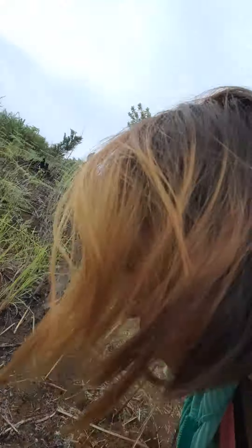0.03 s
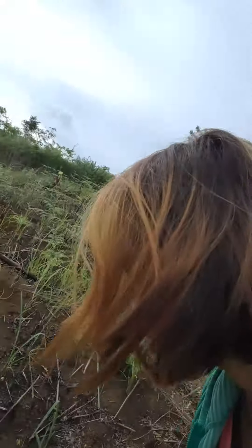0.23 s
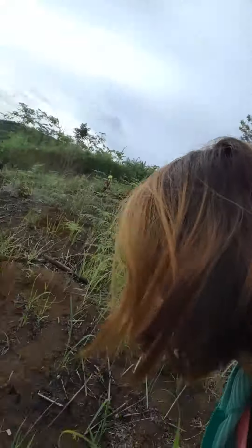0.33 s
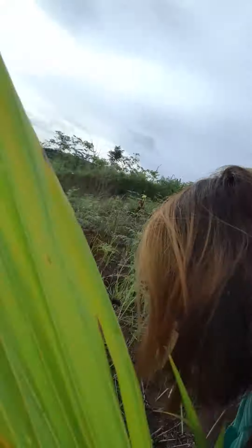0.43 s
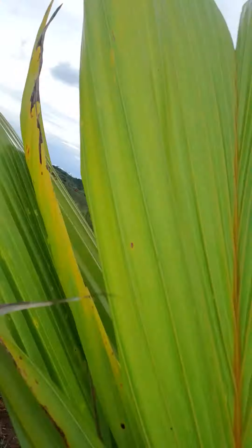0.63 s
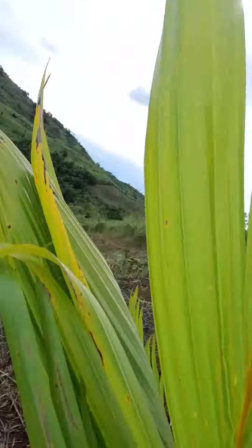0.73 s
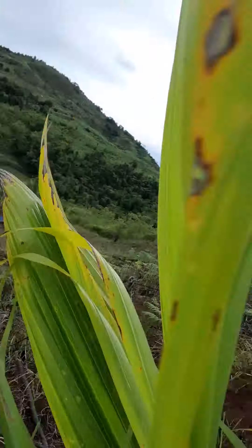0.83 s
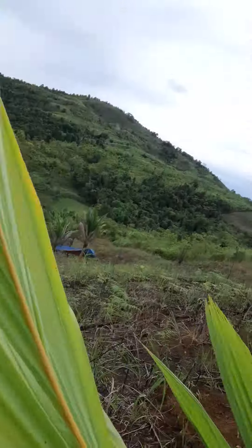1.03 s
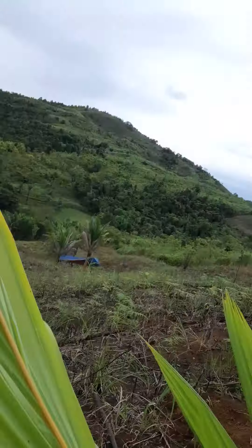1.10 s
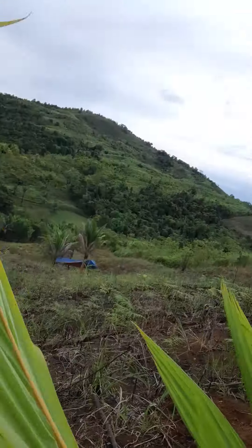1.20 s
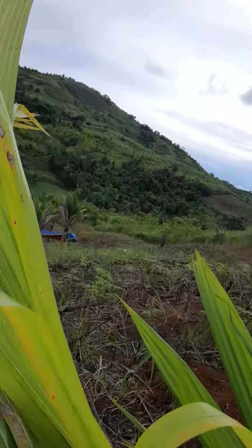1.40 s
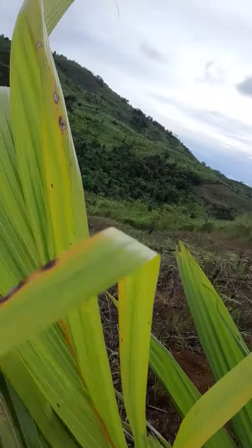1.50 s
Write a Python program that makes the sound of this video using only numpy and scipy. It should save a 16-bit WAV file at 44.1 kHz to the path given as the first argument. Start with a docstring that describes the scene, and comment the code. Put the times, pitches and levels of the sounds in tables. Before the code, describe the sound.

Large stiff leaves rustle and snap against a hand-held phone in an open field. Wind rumbles on the microphone, a leaf knocks against it, then wind and rustling die down while scattered snaps continue.

```python
"""A hand-held phone brushes through large stiff leaves in a breezy open field.
From the start the field hisses softly, gusts rumble on the two microphone openings (ports),
and leaf blades rub and bend. Soon the blades begin to buckle with sharp snaps. Half a second in,
at the height of the gusts, one knocks on the right port and shakes the phone.
Then the wind and rustling die down, while scattered snaps go on almost to the end."""
import sys
import numpy as np
from scipy import signal
from scipy.fft import rfft, irfft, next_fast_len
from scipy.io import wavfile
from scipy.ndimage import uniform_filter1d

SR = 44100
rng = np.random.default_rng(int(sys.argv[2]) if len(sys.argv) > 2 else 0)


def int16_out(signal):
    """Quantize to a 16-bit WAV file."""
    q = np.round(np.clip(np.atleast_2d(signal).T, -1, 1) * 32767)
    wavfile.write(sys.argv[1], SR, q.astype(np.int16))


N = 68355
PORT_LAG_S = 0.000411  # leaf sounds reach the left port this much later


def undb(db):
    """Turn decibels into a number to multiply by."""
    return 10 ** (np.asarray(db) / 20)


def unit(x):
    """Scale a sound so that its average strength (rms) is 1."""
    return x / np.sqrt(np.mean(x ** 2))


def curve(rows):
    """A volume that glides through points of (seconds, dB)."""
    return undb(np.interp(np.arange(N) / SR, *np.array(rows).T))


def colour(x, points):
    """Shape the tone with a filter that passes through points of (Hz, dB)."""
    size = next_fast_len(2 * N, real=True)
    hz, db = np.array(points).T
    gain = undb(np.interp(np.log(np.fft.rfftfreq(size, 1 / SR) + 1), np.log(hz), db))
    # These steps make the filter ring only after a sound, never before it.
    cepstrum = irfft(np.log(gain), size)
    cepstrum[1:size // 2] *= 2
    cepstrum[size // 2 + 1:] = 0
    return irfft(rfft(x, size) * np.exp(rfft(cepstrum)), size)[..., :N]


def wander(per_s):
    """Random values joined by straight lines, per_s of them a second."""
    return np.interp(np.arange(N) / SR * per_s, np.arange(N), rng.standard_normal(N))


def ports(pair, likeness=0.29):
    """Make two unrelated sounds partly alike: the left gets a late copy of the right."""
    left, right = pair
    late = np.interp(np.arange(N) - PORT_LAG_S * SR, np.arange(N), right)
    return np.array([likeness * late + np.sqrt(1 - likeness ** 2) * left, right])


def field():
    """The breeze in distant plants makes a soft, slightly wavering hiss."""
    # Tone of the hiss. Each row: frequency in Hz, gain in dB.
    hiss_tone = [(30,-15),(100,-5),(200,0),(260,-4.5),(335,7),(500,-5),(1000,-8.5),(2000,-6),(4000,-17),(7000,-14.5),(8200,-24),(16000,-19.5)]
    left_db, right_db = -50.5, -47
    hiss = unit(colour(rng.standard_normal((2, N)), hiss_tone))
    return hiss * undb(wander(per_s=7.85)) * undb([[left_db], [right_db]])


def wind():
    """Swirls of air rumble on each port separately, as strongly as the gust there."""
    # Wind pressure at the left and right ports. Each row: time in seconds, level in dB.
    gust_left = [(0,-79),(.05,-69),(.085,-46.5),(.135,-36),(.158,-35.5),(.27,-33),(.31,-48),(.52,-40),(.58,-36),(.68,-47.5),(.95,-61),(1.28,-55),(1.38,-78),(1.55,-76)]
    gust_right = [(0,-41),(.11,-46.5),(.14,-33.5),(.215,-30),(.25,-39),(.34,-27.5),(.39,-33.5),(.47,-30.5),(.505,-18),(.55,-24),(.635,-30.5),(.665,-39),(.755,-42.5),(.79,-54),(.86,-40.5),(.91,-57.5),(1.29,-52.5),(1.37,-59),(1.55,-67)]
    # Tone of the rumble. Each row: frequency in Hz, gain in dB.
    rumble_tone = [(20,-29),(35,-24),(52,-1),(105,-1),(150,-4.5),(210,-32.5),(320,-25),(500,-38),(2000,-60)]
    swirls = colour(rng.standard_normal((2, N)), rumble_tone)
    steady = swirls / np.sqrt(uniform_filter1d(swirls ** 2, size=2200))  # even out over 50 ms
    return steady * np.array([curve(gust_left), curve(gust_right)])


def friction(tone, slips_per_s, spread_db, hiss, spurt_db, fade_s=0.00036):
    """Leaf ribs catch and slip: tiny uneven bursts over a smooth hiss, in quick spurts."""
    happens = rng.random(N) < slips_per_s / SR
    slips = happens * undb(spread_db * np.minimum(rng.exponential(size=N), 5))
    power = signal.lfilter([1], [1, -np.exp(-2 / (fade_s * SR))], slips ** 2)
    spurts = undb(spurt_db * wander(per_s=90))
    strength = np.sqrt(power / power.mean() + hiss ** 2) * spurts
    return unit(colour(ports(strength * rng.standard_normal((2, N))), tone))


def crackle(ticks_per_s=140, spread_db=3.5, fade_s=0.00018):
    """Single leaf fibres tick at random, each a tiny burst of noise."""
    # Tone of the ticks. Each row: frequency in Hz, gain in dB.
    tick_tone = [(300,-19),(2000,-5),(6900,0),(8200,-11),(11500,-8.5),(16000,-3.5)]
    happens = rng.random(N) < ticks_per_s / SR
    ticks = happens * undb(spread_db * np.minimum(rng.exponential(size=N), 4))
    fading = signal.lfilter([1], [1, -np.exp(-1 / (fade_s * SR))], ticks)
    return unit(colour(ports(fading * rng.standard_normal((2, N))), tick_tone))


def leaves():
    """Blades slide with a bright rustle and bend with a hollow one; the left port is sheltered."""
    # Strength of the sliding and of the bending. Each row: time in seconds, level in dB.
    slide_levels = [(0,-51),(.10,-42.5),(.17,-43),(.215,-39),(.255,-47.5),(.33,-38),(.395,-33),(.455,-43.5),(.487,-39),(.52,-41.5),(.585,-36),(.615,-37.5),(.66,-48.5),(.685,-36.5),(.72,-41),(.78,-42.5),(.90,-50),(1.0,-50.5),(1.063,-46.5),(1.072,-42),(1.135,-44),(1.15,-48),(1.21,-47.5),(1.252,-38.5),(1.275,-48),(1.34,-49.5),(1.42,-47.5),(1.46,-45),(1.55,-51)]
    bend_levels = [(0,-47.5),(.15,-43.5),(.28,-49.5),(.40,-37.5),(.455,-35.5),(.487,-23),(.52,-37.5),(.555,-32),(.582,-25),(.61,-39),(.69,-33),(.73,-35.5),(.88,-46.5),(1.0,-50),(1.2,-49),(1.3,-49),(1.36,-66),(1.45,-47),(1.55,-49)]
    # Tones of sliding, bending and the left port's shelter. Each row: frequency in Hz, gain in dB.
    slide_tone = [(200,-28.5),(900,-15),(2000,-2.5),(3000,-2.5),(4000,-2.5),(5000,-3.5),(6900,0),(8100,-11.5),(11500,-7),(16000,-25)]
    bend_tone = [(100,2.5),(200,0),(310,6),(520,-0.5),(900,-2),(1400,-3.5),(2000,-5.5),(3000,-11.5),(8000,-37.5)]
    shelter_tone = [(200,-12.5),(1200,-0.5),(2300,-10.5),(4700,-6.5),(6800,-15),(8500,-5.5),(16000,-12)]
    slide = friction(slide_tone, slips_per_s=2500, spread_db=1.5, hiss=0.47, spurt_db=3)
    slide += crackle() * undb(-8)
    bend = friction(bend_tone, slips_per_s=910, spread_db=2.5, hiss=0.83, spurt_db=3.5)
    left, right = slide * curve(slide_levels) + bend * curve(bend_levels)
    return np.array([colour(left, shelter_tone), right])


def snaps(ring_s=0.00098, grit=0.97, gain_db=-1):
    """A blade buckles: a jolt and a short gritty crack make it ring at two pitches."""
    # Buckling blades. Each row: start in seconds, relative level in dB, low and high pitch in Hz,
    # gain of the bare crack in dB, its fade time in seconds, how much louder the right is in dB.
    buckles = [(.143,-27.5,2360,2730,-1.5,0.0025,-2),(.206,-29,2650,4200,-3,0.0036,8),(0.31,-27,6600,11300,-12,0.0011,16),(0.347,-27.5,985,3900,6,0.0024,8),(0.396,-29,3100,5430,10,0.0028,12),(.449,-33,1970,4100,11,.0012,11),(.4755,-21.5,1900,6540,-4,0.001,22),(0.48,-15.5,805,2100,-3,0.0035,35),(0.4922,-17.5,1010,2020,5,0.0017,29),(0.533,-18.5,4700,6700,5.5,0.0011,0),(0.5347,-15,1080,1260,-4.5,0.0031,5),(0.577,-34.5,1400,2260,9,0.0039,-2.5),(.603,-27,6800,10500,2,0.0011,2),(.638,-23.5,1300,1920,1.5,0.0054,6),(0.678,-21,1210,2000,6,0.0017,22),(.809,-27,6800,11200,-7,.0015,8),(0.86,-37,1830,6760,10,0.002,6),(0.875,-38,6860,11900,9,0.0018,8),(1.012,-34.5,2030,2490,0,0.0053,8),(1.0497,-30.5,1490,3000,9.5,0.0015,11),(1.068,-28,4650,6730,-11,0.0026,20),(1.16,-34.5,3350,5470,11,0.0022,5),(1.248,-27.5,2120,2900,-23,0.0077,22),(1.278,-34.5,2150,4400,7,.0015,12),(1.293,-27,1650,1940,3,0.0025,8),(1.332,-30.5,1430,1600,-21,0.0031,11),(1.375,-28,1060,1740,-12,0.00062,11),(1.3799,-20.5,7530,13900,0,0.0012,20),(1.3805,-19.5,2580,3280,-5,0.0029,5.5),(1.415,-30.5,1000,1660,-25,.003,2)]
    # Tone of all the snaps. Each row: frequency in Hz, gain in dB.
    snap_tone = [(100,-13.5),(500,-2),(1300,-0.5),(3000,-1),(7000,-2.5),(8300,-10.5),(12000,-5),(16000,-12.5)]
    out, t = np.zeros((2, N)), np.arange(2048) / SR
    jolt, lag = (t == 0), int(PORT_LAG_S * SR)
    for start, db, low_hz, high_hz, crack_db, fade_s, right_db in buckles:
        crack = rng.standard_normal((2, len(t))) * np.exp(-t / fade_s)
        force = grit * crack / np.sqrt(fade_s * SR / 2) + jolt
        pitches = np.sin(2 * np.pi * np.outer([low_hz, high_hz], t)).sum(axis=0)
        blade = pitches * np.exp(-t / ring_s)
        ring = signal.fftconvolve(force, blade[None], axes=1)[:, :len(t)]
        left, right = ring + undb(crack_db) * crack
        at = int(start * SR)
        out[0, at + lag:at + lag + len(t)] += undb(db - right_db) * left
        out[1, at:at + len(t)] += undb(db) * right
    return undb(gain_db) * colour(out, snap_tone)


def knocks(left_db=-39):
    """A blade knocks softly on the right port, and each push sets the phone shuddering."""
    # Touches of the blade. Each row: start in seconds, peak push in dB, length in seconds.
    touches = [(0.483,1.5,0.0021),(0.4904,-9,.003),(.494,-5.5,0.0021),(0.4966,-5.5,0.0083),(0.5083,-11,.009),(0.5745,-14.5,0.00365),(0.644,-17,0.0032),(1.0503,-24.5,0.003)]
    # Tone of the thump at the port. Each row: frequency in Hz, gain in dB.
    thump_tone = [(15,4),(50,-6),(105,0),(205,-2),(290,1.5),(480,-5),(1000,1),(4000,-12)]
    # How the held phone rings. Each row: pitch in Hz, seconds to fade by 60 dB, gain in dB.
    phone_rings = [(54.7,0.3,4.5),(105.6,0.25,2.5),(282,0.7,1.5),(346.4,.25,-2.5)]
    t = np.arange(N) / SR
    push, shudder = np.zeros((2, N))
    for start, db, length_s in touches:
        progress = np.clip((t - start) / length_s, 0, 1)
        push += undb(db) * np.sin(np.pi * progress) ** 2
    for hz, fade_s, db in phone_rings:
        sharpness = np.pi * hz * fade_s / np.log(1000)
        shudder += undb(db) * signal.lfilter(*signal.iirpeak(hz, sharpness, fs=SR), push)
    return (colour(push, thump_tone) + shudder) * undb([[left_db], [0]])


def scene():
    """Add up everything that reaches the left and right ports."""
    return wind() + field() + leaves() + knocks() + snaps()


def record(dry, low_hz=31, top_hz=16000):
    """The phone drops the deepest rumble, clips peaks at full scale and cuts the highest treble."""
    low_cut = signal.butter(2, low_hz, "highpass", fs=SR, output="sos")
    top_cut = signal.ellip(8, .2, 70, top_hz, fs=SR, output="sos")
    clipped = np.clip(signal.sosfilt(low_cut, dry), -1, 1)
    return signal.sosfilt(top_cut, clipped)


dry = scene()
out = record(dry)
int16_out(out)
```